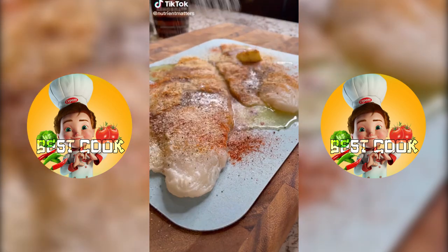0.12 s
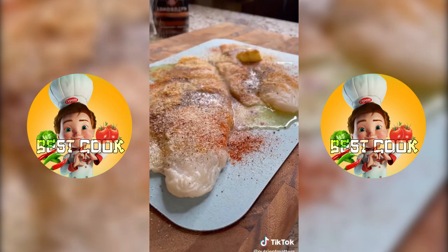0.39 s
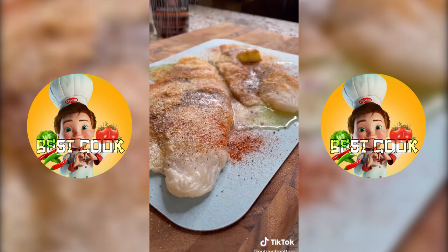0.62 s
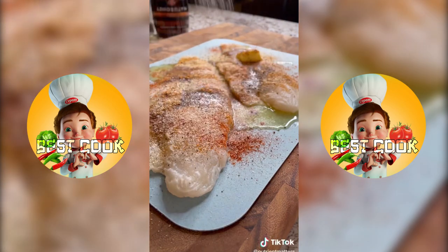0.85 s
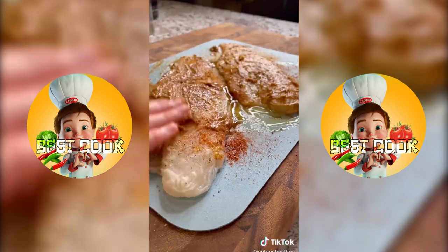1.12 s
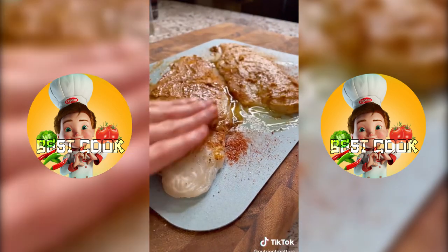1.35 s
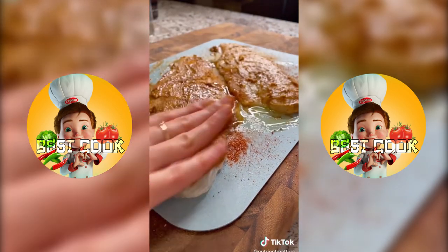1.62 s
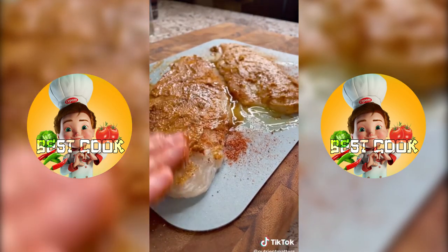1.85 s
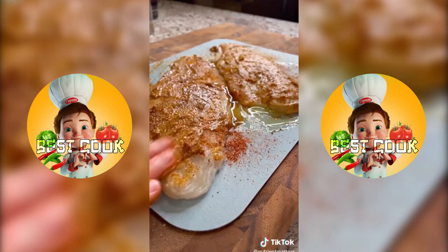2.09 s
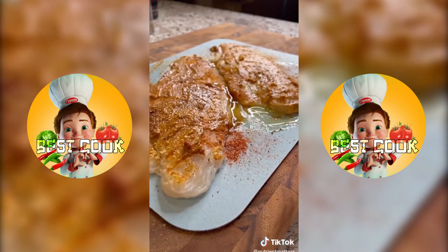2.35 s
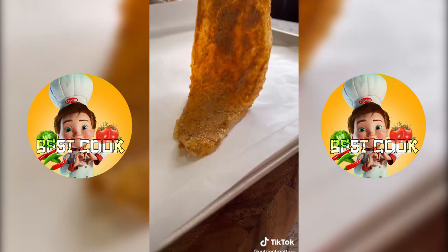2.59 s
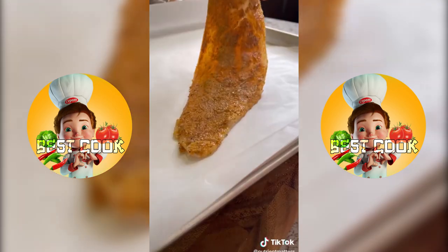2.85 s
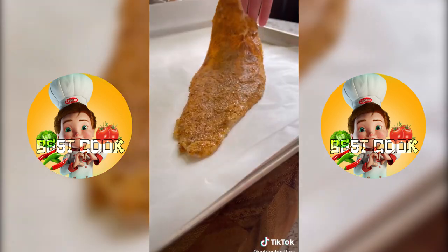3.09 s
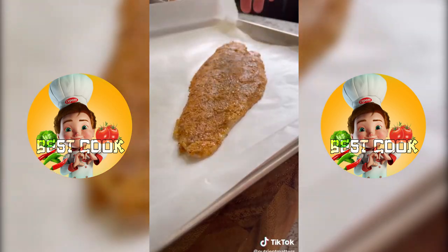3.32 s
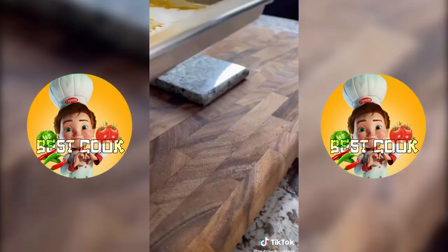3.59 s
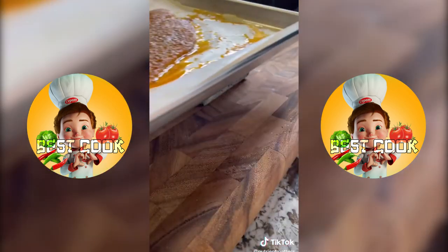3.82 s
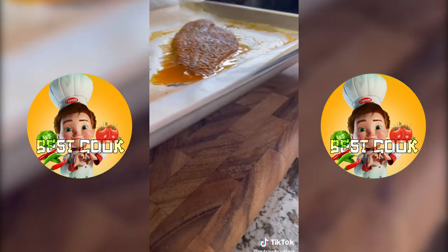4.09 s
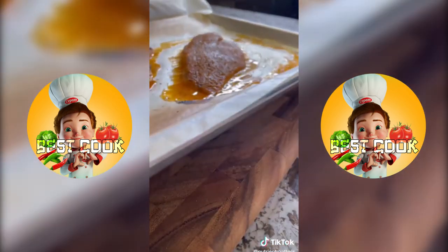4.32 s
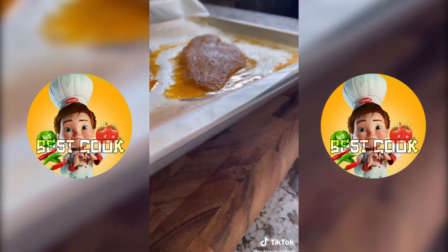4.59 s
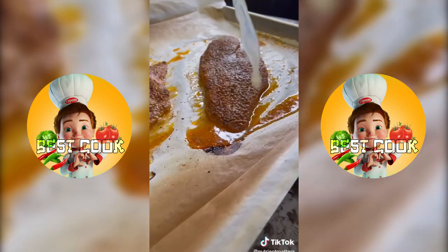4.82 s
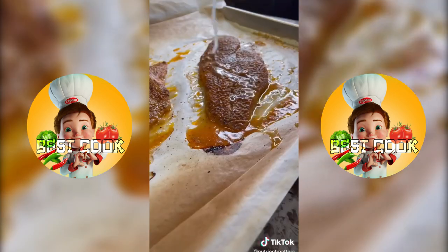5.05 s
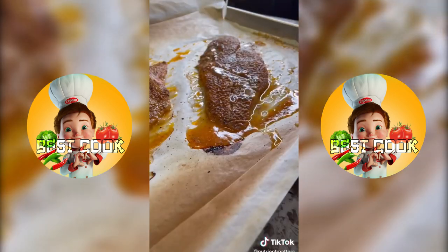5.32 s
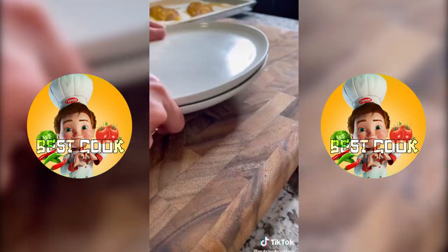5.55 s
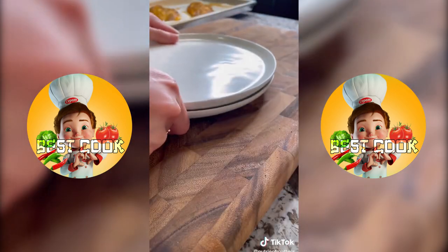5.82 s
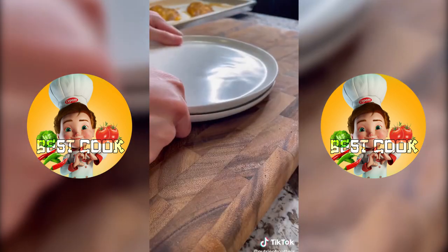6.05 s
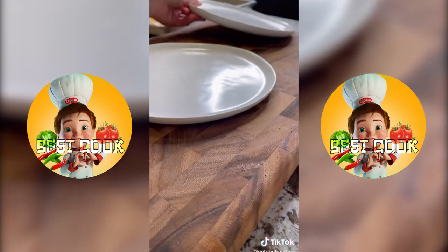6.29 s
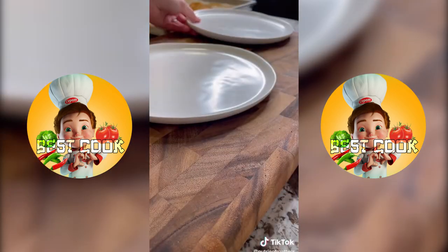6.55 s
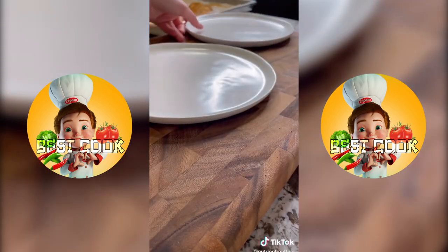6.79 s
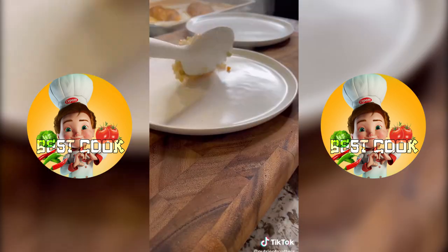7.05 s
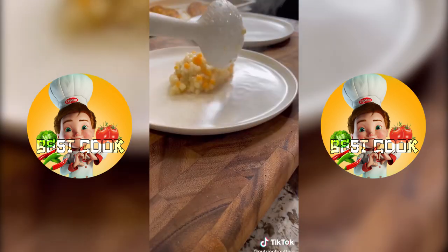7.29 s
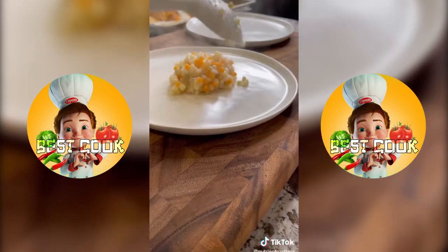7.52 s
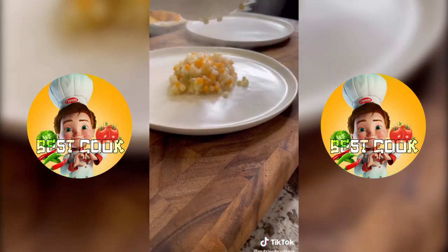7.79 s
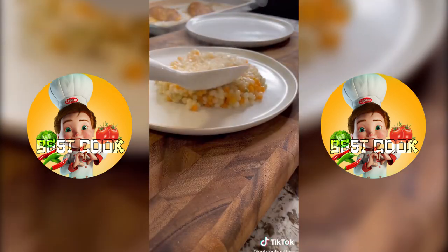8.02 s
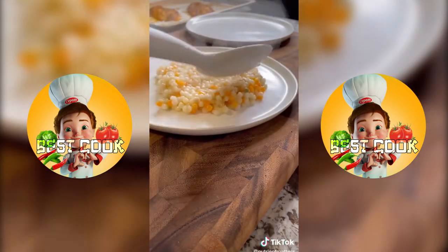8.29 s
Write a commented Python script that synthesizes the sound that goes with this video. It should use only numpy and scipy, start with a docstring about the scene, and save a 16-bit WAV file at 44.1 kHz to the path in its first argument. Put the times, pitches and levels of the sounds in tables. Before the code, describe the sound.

Quick kitchen cuts: faint spice shaking and gritty rubbing, fish slapped onto a tray, sizzling and metallic bouncing, then ceramic plates clattering on wood.

```python
"""Busy kitchen sounds in quick cuts: spice is shaken over fish and rubbed in, the fillet drops on a tray,
the tray sizzles and bounces on a wooden counter, plates rattle and are set out, food is spooned; a refrigerator hums.
Blows set the modes of a body ringing, crack as dying noise and push the counter; powder, grit, paper and fat
are dense random clicks; hum is wavering sines over coloured noise. Early shots are narrow, later ones wide."""
import sys
import numpy as np
from scipy import signal
from scipy.fft import rfft, irfft
from scipy.io import wavfile
from scipy.ndimage import uniform_filter1d

SR = 44100
rng = np.random.default_rng(int(sys.argv[2]) if len(sys.argv) > 2 else 0)


def natural_amplitude(level_db):
    """Convert a level in decibels to a linear amplitude factor, elementwise."""
    exponent = np.asarray(level_db, float) / 20
    return 10 ** exponent


def bounce(signal):
    """Save signal as a 16-bit WAV file at the path given by the first command-line argument."""
    frames = np.transpose(np.atleast_2d(signal))
    limited = np.clip(frames, -1, 1)
    pcm = np.round(limited * 32767).astype(np.int16)
    wavfile.write(sys.argv[1], SR, pcm)


N = 370440
T = np.arange(N) / SR

# the shots and their room: start t/s, rumble level/dB, hum gain/dB, hiss level/dB
SHOTS = [(0, -62.5, 3.5, -80), (0.212, -61, 1, -76.5), (1.034, -61, 2, -79), (2.565, -59.5, 2.5, -80),
         (3.62, -49.5, -9, -62.5), (4.88, -51.5, 5, -70.5), (5.489, -49, -12, -66),
         (6.201, -52.5, 7.5, -63), (7.068, -52.5, 5, -69.5)]
WIDE_FROM_S = SHOTS[4][0]   # the fifth shot and all later ones are wide
# pats on the fish: t/s, strength level/dB, hardness/dB per octave, counter push level/dB
PATS = [(1.641, -45, -4, -64), (1.7283, -30, -7.5, -59), (1.738, -21.5, -1.7, -38),
        (2.105, -41.5, -7.5, -57), (2.114, -22.5, 1.5, -40), (2.446, -42, -7, -68)]


def rms_one(x):
    """Scale to rms 1."""
    return x / np.sqrt(np.mean(x ** 2) + 1e-20)


def by_shot(column):
    """A column of the shot table, held through each shot."""
    rows = np.array(SHOTS)
    shot = np.maximum(np.searchsorted(rows[:, 0], T, "right") - 1, 0)
    return rows[shot, column]


def shot_width():
    """Stereo width (0-1) of the running shot."""
    return np.where(T < WIDE_FROM_S, 0.27, 1)


def shot_lean():
    """Left and right gain of the room: it leans 3 dB to the right in the wide shots."""
    return natural_amplitude(np.outer([.5, -.5], -3 * (T >= WIDE_FROM_S)))


def colour(x, points):
    """Impose a spectrum on x, joining the points along a logarithmic frequency axis; rms 1."""
    hz, points = np.maximum(np.fft.rfftfreq(N, 1 / SR), 1), np.array(points)
    gain_db = np.interp(np.log(hz), np.log(points[:, 0]), points[:, 1])
    return rms_one(irfft(rfft(x) * natural_amplitude(gain_db), N))


def drift(rate):
    """Slow random wander of rms 1: noise through a double low-pass at rate (Hz)."""
    r = np.exp(-80 * np.pi * rate / SR)   # one step lasts 40 samples
    slow = signal.lfilter([1], [1, -2 * r, r * r], rng.standard_normal(N // 40 + 2002))[2000:]
    return np.interp(np.arange(N) / 40, np.arange(len(slow)), rms_one(slow))


def spread(mid, side, width):
    """Left and right from a shared and an opposed part, as wide as the shot allows."""
    w = np.clip(width * shot_width(), 0, 1)
    return np.sqrt(1 - w / 2) * mid + np.sqrt(w / 2) * side * [[1], [-1]]


def strokes(rows, attack_db_s, release_db_s):
    """Level (dB) and tilt of movements that swell, hold and fade; the strongest sets the tilt."""
    s, hold, db, *tilt = np.transpose(rows)[:, :, None]
    before, after = np.maximum(s - T, 0), np.maximum(T - s - hold, 0)
    levels = db - attack_db_s * before - release_db_s * after
    tilt_db = uniform_filter1d(tilt[0][levels.argmax(axis=0), 0], size=400) if tilt else 0
    return np.maximum(levels.max(axis=0), -150), tilt_db


def grains(spectrum, db, tilt_db, per_s, size_db, flicker_db, width):
    """Dense random clicks of uneven size; tilt lifts the treble above about 5 kHz and lowers the rest."""
    sizes = natural_amplitude(size_db * np.minimum(rng.exponential(1, (2, N)), 5)) * rng.choice([-1, 1], (2, N))
    x = colour(sizes * (rng.random((2, N)) < per_s / SR), spectrum)
    low = signal.sosfilt(signal.butter(2, 5000, fs=SR, output="sos"), x)
    shared = drift(16)   # the two halves flicker partly together
    low_db = flicker_db * (shared + drift(40)) / 2 - tilt_db
    high_db = flicker_db * (shared + drift(40)) / 2 + tilt_db
    x = low * natural_amplitude(low_db) + (x - low) * natural_amplitude(high_db)
    return natural_amplitude(db) * spread(*x, width)


def ring(clicks, hz, t60):
    """A unit click starts a sine of height 1 that falls 60 dB in t60 seconds."""
    r, w = natural_amplitude(-60 / (t60 * SR)), 2 * np.pi * hz / SR
    return signal.lfilter([0, np.sin(w)], [1, -2 * r * np.cos(w), r * r], clicks + 1e-18)


def counter(push):
    """The heavy wooden top answers a push with low modes that swell for some milliseconds."""
    # modes of the wooden top: f/Hz, level/dB, t60/s
    modes = [(76.6, -19, 0.041), (96.5, 2.5, 0.14), (118.2, -2.5, 0.21), (153, -12.5, 0.2),
             (177, 5.5, 0.057), (226.6, -13.5, 0.46)]
    soft = np.convolve(push, np.hanning(200) / 100)[:N]
    # it hardly radiates below its first mode
    soft = signal.sosfilt(signal.butter(5, 58, "high", fs=SR, output="sos"), soft)
    lean = rng.normal(0, 2.2, len(modes))   # dB: each mode reaches left and right a little differently
    out = 0
    for (hz, db, t60), side in zip(modes, lean):
        out = out + natural_amplitude(db + side * np.array([[.5], [-.5]]) * shot_width()) * ring(soft, hz, t60)
    return out * shot_lean()


def struck(blows, modes, ring_db, contact_s, crack_db, crack_s, crack_tilt_db, crack_top_hz, uneven_db,
           pan_db, rattle_s, rattle_db, rough=0, damping=1):
    """Each blow rings the body, cracks as dying noise and thuds into the counter; hard contact favours treble."""
    s, db, hardness, thud_db = np.transpose(blows)
    at, out = np.round(s * SR).astype(int), np.zeros((2, N))
    luck = rng.normal(0, 1, (len(s), len(modes), 3))
    rebounds = rng.random((len(s), 2, 3))   # three rebounds a blow
    rise = natural_amplitude(-60 / (contact_s * SR))
    # loose contact makes each ring unsteady
    loose = np.clip(rough, 0, 1)
    chatter = np.sqrt(1 - loose ** 2) + loose * drift(47)
    for k, (hz, mode_db, t60) in enumerate(modes):
        clicks = np.zeros((2, N))
        # a gritty contact starts the modes unevenly, by about half a millisecond
        touch = at + (.0005 * SR * luck[:, k, 2]).astype(int)
        mode_level = db + ring_db + mode_db + hardness * np.log2(hz / 1000)
        clicks[:, touch] = natural_amplitude(mode_level + uneven_db * luck[:, k, 0])
        first = clicks[0, touch]
        for late, size in rebounds.T:   # the contact rattles: weaker touches follow
            again = touch + (rattle_s * SR * late).astype(int)
            clicks[0, again] += natural_amplitude(rattle_db) * first * np.sign(size - .5)
        # every mode radiates towards a side of its own
        clicks[1, touch] *= 0.63 * np.clip(luck[:, k, 1], -1, 1)
        # the ring swells while the contact lasts
        swell = 2 * (1 - rise) * ring(clicks, hz, contact_s)
        out += np.roll(chatter, k * SR // 3) * ring(swell, hz, t60 * damping)
    white, crack = rng.standard_normal((2, N)), 0
    decay = np.convolve([1, -rise], [1, -natural_amplitude(-60 / (crack_s * SR))])
    for low in (350, 700, 1400, 2800, 5600, 10500):   # lower edges of noise bands, Hz
        clicks = np.zeros(N)
        band_db = db + crack_db + (hardness + crack_tilt_db) * np.log2(low / 700)
        clicks[at] = natural_amplitude(band_db) / np.sqrt(min(low, 5600) / SR)
        dying = signal.lfilter([1 - rise], decay, clicks + 1e-18)
        band = signal.butter(2, [low, min(2 * low, 15500)], "band", fs=SR, output="sos")
        crack = crack + signal.sosfilt(band, dying * white)
    out += signal.sosfilt(signal.butter(12, crack_top_hz, fs=SR, output="sos"), crack)
    # the sharp top comes from one spot
    out[1] = signal.sosfilt(signal.butter(1, 4000, fs=SR, output="sos"), out[1])
    push = np.zeros(N)
    push[at] = natural_amplitude(thud_db)
    out = spread(*out, 0.39) * natural_amplitude(pan_db * np.array([[.5], [-.5]]))
    return out + counter(push)


def by_strength(rows, hardness, change):
    """Insert each blow's hardness: its value at -40 dB, and its change per dB of strength."""
    return [(s, db, hardness + change * max(db + 40, -8), *rest) for s, db, *rest in rows]


def scrape(rows, modes, per_s, damping, tilt_db):
    """Dense uneven catches ring a body that the contact damps."""
    catches = rng.exponential(1, (2, N)) * rng.choice([-1, 1], (2, N))
    catches = catches * (rng.random((2, N)) < per_s / SR)
    body = 0
    for hz, db, t60 in modes:
        body = body + natural_amplitude(db + tilt_db * np.log2(hz / 1000)) * ring(catches, hz, t60 * damping)
    level_db, _ = strokes(rows, attack_db_s=2004, release_db_s=307.5)
    return natural_amplitude(level_db) * spread(*rms_one(body), 1.0)


def baking_tray():
    """The fillet drops on the tray, later the tray bounces; short modes ring and the counter thuds."""
    # the drop, then the bounces: t/s, strength level/dB, hardness/dB per octave, counter push level/dB
    blows = [(3.3575, -5, -0.5, -25), (4.379, -5, 2.5, -35.5), (4.417, -20.5, -17, -22),
             (4.438, -36, -9, -22), (4.465, -7, 3.5, -29.5), (4.5, -31, -9, -24.5), (4.523, -9, 3.5, -58.5),
             (4.564, -34.5, -16.5, -27), (4.619, -21, 2, -33)]
    # modes of the tray: f/Hz, level/dB, t60/s
    modes = [(417, -18, 0.14), (495, -9, 0.032), (655, 3.5, 0.027), (746, -16, 0.056), (805, -4.5, 0.037),
             (1248, -5, 0.0073), (1470, -21, 0.02), (2775, -18.5, .02), (3150, -5, 0.0026),
             (3760, -14.5, 0.0049), (4970, -0.5, 0.0033), (6110, -11.5, 0.0094)]
    drop = struck(blows[:1], modes, rattle_s=0.011, rattle_db=-12.5, pan_db=-2, crack_db=-23.0,
                  ring_db=-5.0, contact_s=0.0064, crack_s=0.084, crack_tilt_db=2.5,
                  crack_top_hz=13000, uneven_db=-1.3, damping=0.83)
    bounces = struck(blows[1:], modes, rattle_s=.008, rattle_db=-10.5, pan_db=-1.0, crack_db=-16.5,
                     ring_db=-10.5, contact_s=0.0068, crack_s=0.019, crack_tilt_db=-1.5,
                     crack_top_hz=13200, uneven_db=5.0, rough=.25)
    return drop + bounces * (T < SHOTS[5][0])


def single_plate():
    """One plate is set down, shifted and set down again; its foot ring drags on wood."""
    # set down, shifted, set down again: t/s, strength level/dB, hardness/dB per octave, counter push level/dB
    blows = [(6.352, -6.5, 0, -20), (6.699, -72, -3, -44), (6.778, -47.5, 2.5, -49), (6.826, -61, -16, -37),
             (6.861, -19.5, -3, -30.5), (6.877, -38, -1, -19)]
    # modes of the plate: f/Hz, level/dB, t60/s
    modes = [(278, -20.5, 0.14), (427.5, -5, 0.11), (600, -6, 0.087), (748, 3, 0.041), (970, -6.5, 0.043),
             (1010, -6.5, 0.02), (1318, 5, 0.048), (1345, -15, 0.35), (1700, -17.5, .07),
             (2096, -8.5, 0.033), (2500, 10, 0.018), (2605, -22.5, 0.28), (2920, -4.5, 0.011),
             (3460, -11, 0.13), (3580, -4.5, 0.023), (4180, -22.5, 0.025), (5070, -23, 0.086)]
    # the foot ring drags: t/s, hold/s, level/dB
    drags = [(6.345, 0.0056, -59), (6.37, 0.16, -74), (6.6, 0.365, -61)]
    plate = struck(blows[:1], modes, rattle_s=.012, rattle_db=-13.5, pan_db=0.5, crack_db=-16.0,
                   ring_db=-10.0, contact_s=0.0037, crack_s=0.047, crack_tilt_db=-5.0,
                   crack_top_hz=4700, uneven_db=1.42, rough=.1)
    # fingers on the rim damp the later rings
    plate = plate + struck(blows[1:], modes, rattle_s=0.00944, rattle_db=-7.0, pan_db=4.0, crack_db=-11.5,
                           ring_db=-12, contact_s=0.0017, crack_s=0.061, crack_tilt_db=-3.5,
                           crack_top_hz=10600, uneven_db=-0.6, rough=0.54, damping=0.47)
    plate = plate + scrape(drags, modes, per_s=1900, damping=0.27, tilt_db=7.5)
    return plate * (T < SHOTS[8][0])


def stacked_plates():
    """Two stacked plates chatter, grind rim on rim and are set down; light touches are the brightest."""
    # touches: t/s, strength level/dB, counter push level/dB
    blows = [(5.5294, -55, -57), (5.5525, -22, -48), (5.583, -55, -62), (5.6234, -51, -53),
             (5.657, -55, -65), (5.7058, -54, -48), (5.747, -49.5, -45), (5.7828, -52, -61.5),
             (5.817, -48, -57.5), (5.8857, -61, -55), (5.9499, -51.5, -60), (5.978, -49, -38.5),
             (5.991, -48, -43), (6.0243, -41.5, -45), (6.0501, -16, -34.5), (6.1014, -19, -31.5),
             (6.1296, -56, -31.5)]
    # modes of the two plates: f/Hz, level/dB, t60/s
    modes = [(446, -30, 0.24), (717, -5.5, 0.0174), (1400, -2.5, 0.032), (1620, -0.5, 0.031),
             (2130, -3.5, .03), (2333, 2, 0.02), (2572, 4.5, .02), (3027, -1.5, 0.019), (3410, 2.5, 0.016),
             (3815, -8.5, .015), (4160, -3.5, 0.034), (4606, -6, .012), (5066, -14, 0.031),
             (6120, -16.5, 0.026), (7020, -18.5, 0.022), (10500, -21.5, 0.02)]
    # rims grind together: t/s, hold/s, level/dB
    grinds = [(5.535, 0.04, -49), (5.61, 0.23, -62), (5.97, 0.052, -56), (6.04, .012, -48.5),
              (6.055, .1, -42.5)]
    stack = struck(by_strength(blows, 4.5, -0.35), modes, rattle_s=0.0062, rattle_db=-5, pan_db=2.5,
                   crack_db=-21, ring_db=-11.0, contact_s=0.0071, crack_s=0.022, crack_tilt_db=-4.0,
                   crack_top_hz=13950, uneven_db=-3.5, rough=0.38)
    stack = stack + scrape(grinds[:-1], modes, per_s=2600, damping=0.37, tilt_db=0.5)
    # pressed down, duller
    stack = stack + scrape(grinds[-1:], modes, per_s=2500, damping=0.68, tilt_db=-14.5)
    return stack * (T < SHOTS[7][0])


def fish_pats():
    """A hand pats the fish: the board below rings briefly until the cut."""
    # modes of the board: f/Hz, level/dB, t60/s
    modes = [(123.4, -2.5, 0.2), (876, -5, 0.22), (980, 13.5, 0.0081), (1510, 13, 0.0036),
             (2170, 18.5, 0.0054), (3200, 16, 0.0014)]
    pats = struck(PATS, modes, rattle_s=0.0039, rattle_db=-7.5, pan_db=1.0, crack_db=-21,
                  ring_db=-16.5, contact_s=0.0021, crack_s=0.027, crack_tilt_db=-0.5,
                  crack_top_hz=9600, uneven_db=1.2, rough=0.45)
    return pats * (T < SHOTS[3][0])


def paper_snaps():
    """Paper snaps: cracks of noise without a ringing body, brightest when light."""
    # snaps: t/s, strength level/dB
    rows = [(2.9786, -48), (3.0604, -41), (3.1283, -37), (3.1567, -38), (3.1754, -39.5), (3.2772, -43.5),
            (3.2995, -36.5), (3.3089, -31), (3.3298, -26.5)]
    blows = [(*row, -90) for row in by_strength(rows, 0.83, -0.13)]   # hardly any thud
    return struck(blows, [], rattle_s=0, rattle_db=0, pan_db=2.5, crack_db=-21.0, ring_db=0, contact_s=.005,
                  crack_s=0.04, crack_tilt_db=0.5, crack_top_hz=12440, uneven_db=0)


def ticking():
    """Coarse grains crushed under the hand, then drops of juice, then faint ticks while food is spooned."""
    # small cracks of noise: t/s, strength level/dB
    rows = [(1.2534, -39.5), (1.321, -35), (1.4495, -35.5), (1.613, -44), (5, -46), (5.227, -49),
            (5.393, -42.5), (7.236, -60), (7.507, -57), (8.222, -58.5)]
    blows = [(*row, 1, -90) for row in rows]   # hardness 1 dB per octave, hardly any thud
    return struck(blows, [], rattle_s=0, rattle_db=0, pan_db=0.5, crack_db=-16.0, ring_db=0, contact_s=0.015,
                  crack_s=0.012, crack_tilt_db=3.37, crack_top_hz=13300, uneven_db=0)


def spits_and_tray_tick():
    """Fat spits, and the tray ticks once near the end: short chatters of clicks, each with its own pitch."""
    # spits of fat, the last row the tick of the tray: t/s, level/dB, pitch f/Hz
    rows = [(3.697, -55, 2500), (3.723, -37.5, 3500), (3.732, -50, 3200), (3.759, -59, 4000),
            (3.796, -41.5, 4600), (3.853, -43, 4300), (3.877, -40, 4000), (4.009, -59.5, 3500),
            (4.102, -45, 2540), (4.259, -50.5, 3400), (4.298, -43.5, 5200), (4.667, -46.5, 4070)]
    out = np.zeros((2, N))
    lag = T[:2000] / 0.009   # in units of the chatter's length of 9 ms
    envelope = np.minimum(lag * 5.1, 1) * np.exp(-lag ** 2)
    for (s, db, hz), white in zip(rows, rng.standard_normal((len(rows), 2, 2000))):
        chatter = rms_one(ring(white ** 3, hz, 16 / hz))   # each click rings 16 cycles
        start = int(s * SR)
        out[:, start:start + 2000] += natural_amplitude(db) * chatter * envelope
    return spread(*out, 0.36) * natural_amplitude([[2.5], [-2.5]])


def frying():
    """Hot fat on the tray as dense clicks, duller when it sizzles hard."""
    # vigour of the sizzle: t/s, level/dB
    vigour = [(3.62, -58), (3.686, -49.5), (3.802, -48.5), (4.202, -55), (4.49, -51), (4.718, -53),
              (4.88, -54)]
    # colour of hot fat: f/Hz, relative level/dB
    fat = [(530, -21.5), (900, -6.5), (1950, -1), (2420, 9), (2830, 5), (3430, 5.5), (5220, 2.5),
           (5610, -6), (6030, 0), (7580, -7), (11600, -3), (16000, -27.5)]
    db = np.interp(T, *np.transpose(vigour), left=-150, right=-150)
    tilt_db = 3 - 0.28 * np.maximum(db + 50, -10)
    return grains(fat, db, tilt_db, per_s=9600, size_db=2.5, flicker_db=2.5, width=0.53)


def shaker():
    """Each of ten shakes of the jar throws a puff of powder that patters on the fish."""
    # colour of the spice: f/Hz, relative level/dB
    spice = [(710, -52), (1200, -23), (1290, -29), (1730, -15), (2430, -6.5), (4550, -4), (6160, 3),
             (8260, 3.5), (9820, -19), (11800, 5), (16000, -8.5)]
    start_s, period_s, puff_s = 0.207, 0.0907, 0.036
    k = np.arange(10)[:, None]
    # levels climb to the third shake, then fall
    db = -55 - 3.5 * np.maximum(2 - k, 0) - 1.06 * np.maximum(k - 2, 0)
    db = db + 2 * (-1) ** k   # every other shake, a downstroke, is stronger
    puffs = (natural_amplitude(db) * np.exp(-((T - start_s - period_s * k) / puff_s) ** 2)).sum(axis=0)
    shot = (T > SHOTS[1][0]) & (T < SHOTS[2][0])
    patter = grains(spice, 0, 0, per_s=14000, size_db=-9.0, flicker_db=1.5, width=1.0)
    return (puffs + natural_amplitude(-68.5)) * shot * patter


def rubbing():
    """Grit under the hand: a resting hiss that swells with each stroke."""
    # strokes of a gritty hand over the fish: t/s, hold/s, level/dB
    rubs = [(1.07, 0.08, -58.5), (1.21, .13, -58.5), (1.42, 0.072, -60), (1.5, 0.051, -66),
            (1.58, 0.031, -58), (1.672, 0.0075, -65), (1.735, 0.031, -63), (1.81, 0.082, -59.5),
            (1.9, 0.051, -67.5), (2.1, 0.094, -61), (2.18, 0.058, -68.5)]
    # colour of the grit: f/Hz, relative level/dB
    grit = [(710, -47), (1200, -17), (1640, -13), (2890, 8), (4040, 2.5), (4450, 4.5), (8260, 9),
            (9720, -2), (11600, 14.5), (16000, -0.5)]
    db, _ = strokes(rubs, attack_db_s=902, release_db_s=600)
    resting = (T > SHOTS[2][0]) & (T < PATS[0][0])   # the hand stays on the fish until the first pat
    db = np.where(resting, np.maximum(db, -69), db)
    return grains(grit, db, 0, per_s=9900, size_db=4.0, flicker_db=1.5, width=0.99)


def sliding_hand():
    """The hand slides over the board until the cut: very dense clicks."""
    # the slide: t/s, hold/s, level/dB
    slide = [(2.45, 0.1124, -51.5)]
    # colour of the slide: f/Hz, relative level/dB
    tone = [(530, -15), (900, -20), (2420, -11.5), (2930, -10.5), (4460, -20), (7770, -23.5),
            (10800, -32.5), (12600, -16), (16000, -50)]
    db, tilt_db = strokes(slide, attack_db_s=1500, release_db_s=9000)
    return grains(tone, db, tilt_db, per_s=36000, size_db=2.5, flicker_db=2.5, width=0.45)


def rustles_and_soft_hiss():
    """Paper, food and plates are handled, and the fillet's drop dies away in a soft hiss: flickering clicks."""
    # rustles, and the soft hiss at 3.42 s: t/s, hold/s, level/dB, treble tilt/dB
    rows = [(2.58, 0.22, -84.5, 4.5), (3.04, 0.095, -68.5, -3), (3.27, 0.11, -69, 2),
            (3.335, .02, -57.5, -4.5), (3.42, 0.19, -70, -1.5), (4.94, 0.15, -62.5, 3),
            (5.128, 0.0071, -64, 2.5), (5.16, 0.12, -82, 11), (5.385, 0.015, -80.5, 10),
            (5.455, 0.036, -74.5, 6), (5.52, 0.047, -67.5, 6.5), (5.68, 0.17, -71.5, 6),
            (5.94, 0.12, -83, 4), (6.21, 0.066, -67, -7), (6.45, 0.213, -64.5, -2), (6.66, 0.34, -69, 5.5),
            (7.12, 0.18, -76.5, 0.5), (7.34, 0.14, -77.5, 1.5), (7.98, 0.21, -74, 0.5),
            (8.21, 0.024, -77.5, 8.5), (8.28, 0.052, -76, -3)]
    # colour of paper: f/Hz, relative level/dB
    paper = [(710, -50), (1200, 4.5), (1930, -1), (2250, 3.5), (3550, 0.5), (4650, -1.5), (7570, -9.5),
             (11900, 1), (16000, -37)]
    db, tilt_db = strokes(rows, attack_db_s=703.5, release_db_s=399)
    return grains(paper, db, tilt_db, per_s=26000, size_db=3.5, flicker_db=6.0, width=0.32)


def rocking_board():
    """The board rocks on the counter under the hand: noise through a low resonance."""
    # pushes: t/s, hold/s, level/dB
    pushes = [(1.12, 0.078, -46.5), (1.345, 0.027, -51)]
    db, _ = strokes(pushes, attack_db_s=159, release_db_s=202)
    return natural_amplitude(db) * rms_one(ring(rng.standard_normal(N), 65, 0.25))


def kitchen(x):
    """Dense echoes: a tail of noise that dies away, its treble sooner."""
    t60_s = 0.37
    lag = np.arange(SR // 2) / SR
    white = rng.standard_normal((2, len(lag)))
    low = signal.sosfilt(signal.butter(1, 3000, fs=SR, output="sos"), white)
    tail = low + (white - low) * natural_amplitude(-20.5 * lag / t60_s)
    tail = tail * natural_amplitude(-60 * lag / t60_s) * np.minimum(lag / 0.0045, 1)
    tail /= np.sqrt(np.sum(tail ** 2) / 2)
    tail[1] *= natural_amplitude(2.0)   # echoes come from the sides
    return spread(*signal.fftconvolve(x[None], tail, axes=1)[:, :N], 0.94)


def after_cuts():
    """1 for a tenth of a second after the cuts that interrupt an echo, otherwise 0."""
    return sum((T > SHOTS[k][0]) & (T < SHOTS[k][0] + .1) for k in (3, 5, 7, 8))


def room_tone():
    """Refrigerator rumble with wavering hum lines, a faint hiss, and a hollow boom in the opening shot."""
    # compressor lines: f/Hz, level/dB before the hum gain of the shot
    lines = [(59, -60), (150, -63), (295, -71.5), (430, -73), (3400, -91.5)]
    # rumble colour in the narrow and in the wide shots, and hiss colour: f/Hz, relative level/dB
    narrow_rumble = [(25, -25), (55, -36), (95, -4), (147, 0.5), (214, -7), (437, -10), (578, -11),
                     (889, -16), (1050, -30), (1300, -61.5), (1690, -72), (2860, -120)]
    wide_rumble = [(15, -41), (25, -16), (33, -21), (58, 0.5), (104, -0.5), (270, -11), (409, -10.5),
                   (490, -16), (608, -13), (904, -33), (1300, -56), (1690, -67.5), (2860, -120)]
    hiss_colour = [(530, -25.5), (900, -5), (1270, -3), (3260, -11), (3820, -13), (5160, -11), (6340, -20),
                   (10400, -24.5), (14000, -33)]
    hum = 0
    for hz, db in lines:
        level = natural_amplitude(db + 0.25 * drift(3.2)) * np.sqrt(2)
        hum = hum + level * np.sin(2 * np.pi * hz * T + 0.72 * drift(40))
    white = rng.standard_normal((2, N))
    mid, side = np.where(T < WIDE_FROM_S, colour(white, narrow_rumble), colour(white, wide_rumble))
    # deep bass is alike left and right
    side = signal.sosfilt(signal.butter(1, 150, "high", fs=SR, output="sos"), side)
    rumble = natural_amplitude(by_shot(column=1) + 2.3 * drift(6.1)) * spread(mid, side, 0.6)
    hiss = natural_amplitude(by_shot(column=3)) * spread(*colour(rng.standard_normal((2, N)), hiss_colour), 1)
    boom = natural_amplitude(-53.0) * (T < SHOTS[1][0]) * rms_one(ring(rng.standard_normal(N), 217, 0.063))
    return (rumble + hum * natural_amplitude(by_shot(column=2))) * shot_lean() + hiss + boom


def scene():
    """All shots in a row; some sounds are silenced at a cut, and only blows, ticks and spits echo."""
    blows = baking_tray() + single_plate() + stacked_plates() + fish_pats() + paper_snaps()
    blows = blows + ticking() + spits_and_tray_tick()
    echo_gain = natural_amplitude(np.where(T < WIDE_FROM_S, -12.5, -8))
    blows = blows + echo_gain * kitchen(blows.mean(axis=0)) * (1 - after_cuts())
    textures = frying() + shaker() + rubbing() + sliding_hand() + rustles_and_soft_hiss()
    return blows + textures + rocking_board() + room_tone()


def low_pass(x):
    """Removes everything above the highest recorded frequency."""
    return signal.sosfilt(signal.butter(12, 16810, fs=SR, output="sos"), x)


def record(dry):
    """The microphone drops the deepest bass and the very top."""
    bass_cut = signal.butter(3, 45, "high", fs=SR, output="sos")
    top_cut = signal.cheby2(10, 50, 16700, fs=SR, output="sos")
    mix = signal.sosfilt(np.vstack([bass_cut, top_cut]), dry)
    return low_pass(mix)


dry = scene()
out = record(dry)
bounce(out)
```